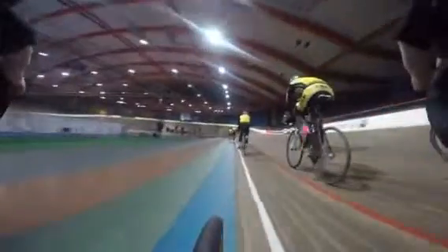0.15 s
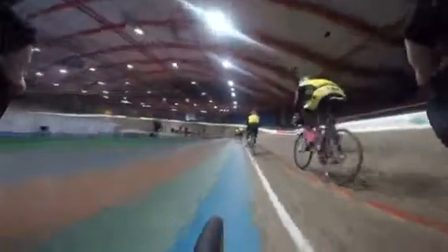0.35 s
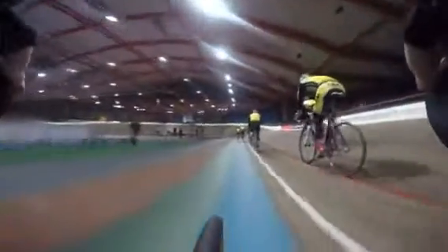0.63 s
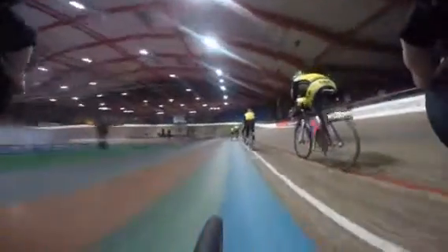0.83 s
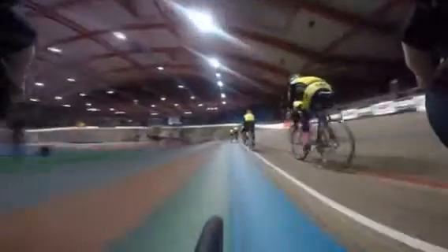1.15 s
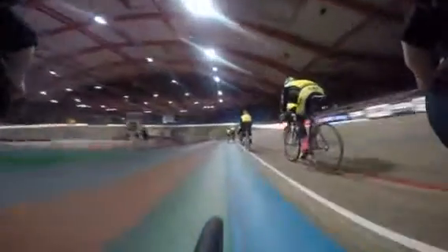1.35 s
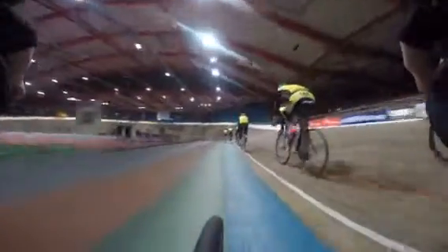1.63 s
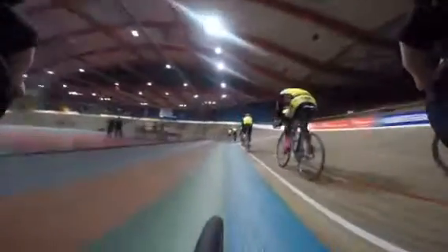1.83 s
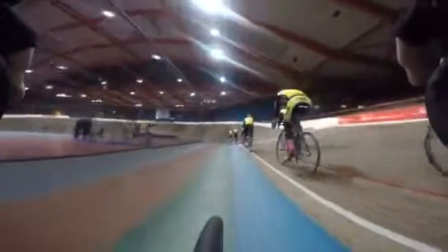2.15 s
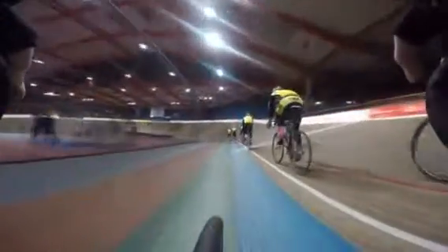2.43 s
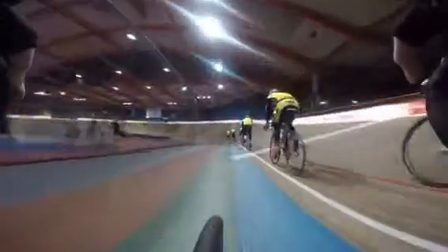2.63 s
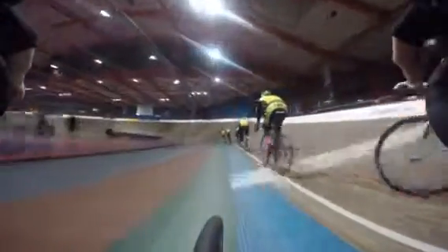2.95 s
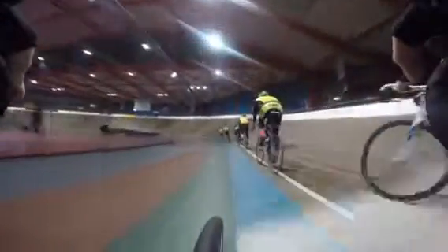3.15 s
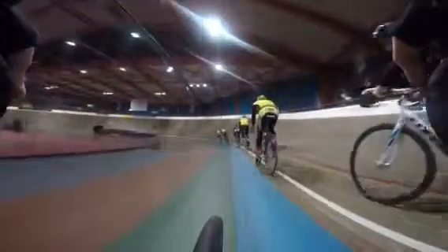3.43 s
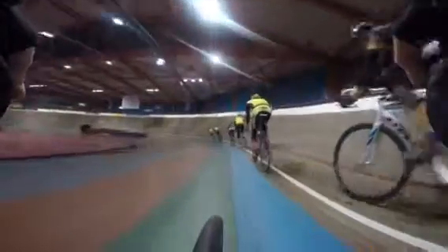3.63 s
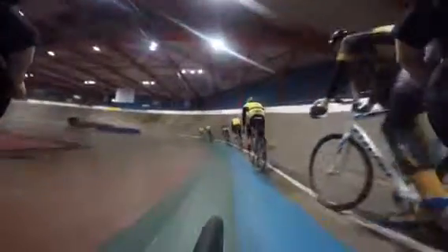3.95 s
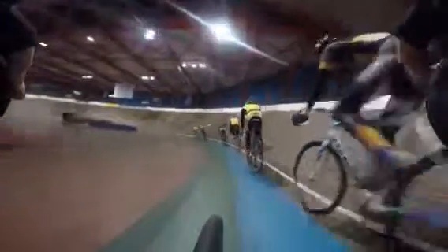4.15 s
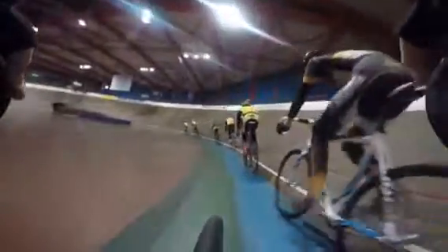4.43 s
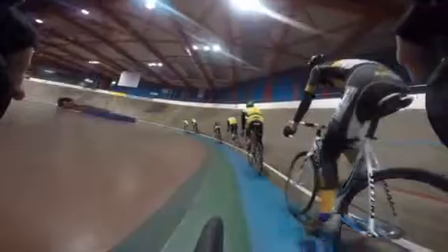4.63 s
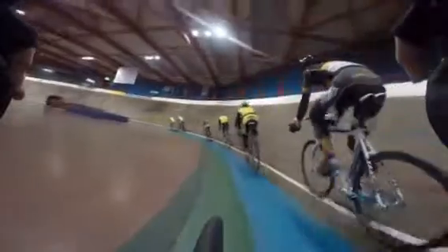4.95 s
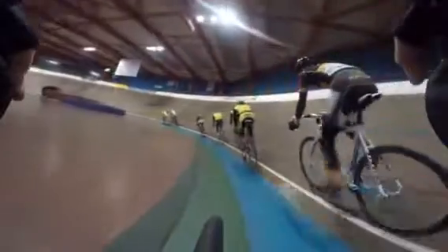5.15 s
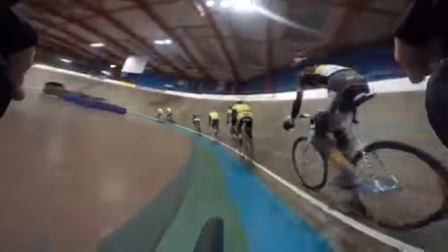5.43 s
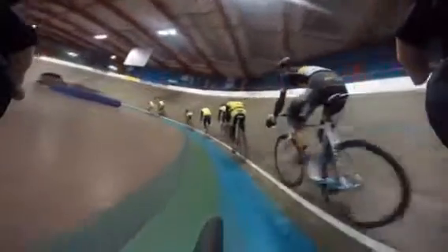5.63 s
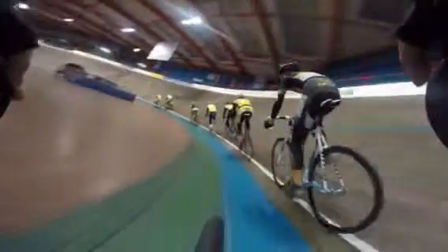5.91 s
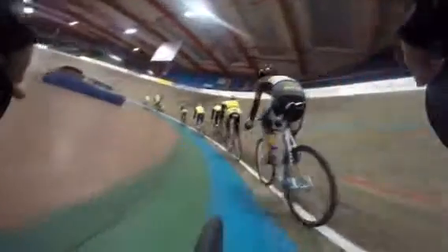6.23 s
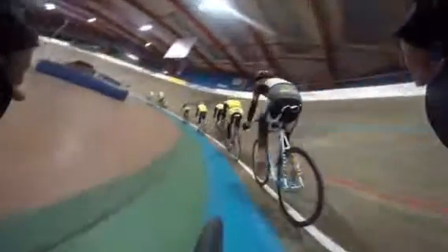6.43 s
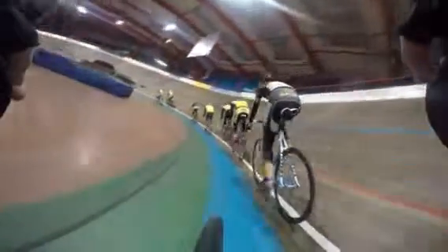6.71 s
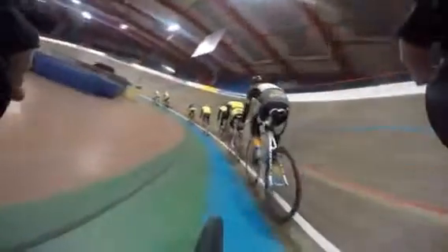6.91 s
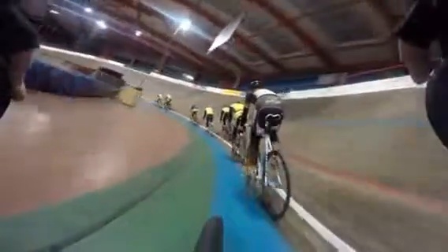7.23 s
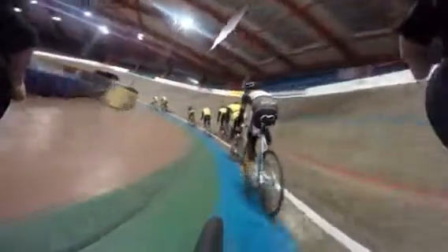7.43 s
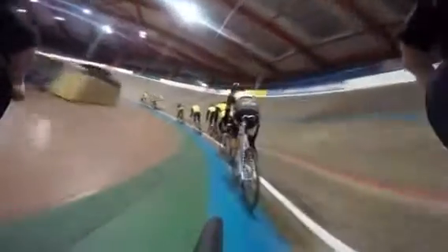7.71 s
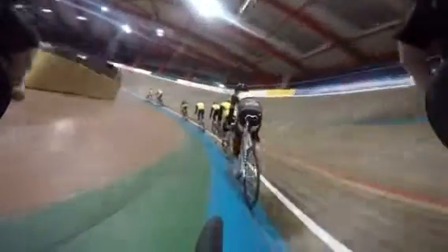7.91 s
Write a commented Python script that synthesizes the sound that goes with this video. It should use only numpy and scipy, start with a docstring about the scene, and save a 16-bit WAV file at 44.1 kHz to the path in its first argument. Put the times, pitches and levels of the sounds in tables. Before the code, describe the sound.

A track bicycle rolls around an indoor wooden track, heard from a microphone fixed under the handlebar. Low wind buffeting runs throughout, over a hollow tyre drone and irregular knocks from the boards. The chain chatters in pulses with the pedalling, throwing off sharp metallic clacks. The handlebar briefly shudders a few times and faint chirps come and go. Near the end the chain softens and the clacks thin out.

```python
"""A track bicycle laps an indoor wooden velodrome, heard from a camera bolted under its handlebar.
From the start wind buffets the case, tyres drone and knock on the boards through the ringing mount,
and the chain chatters and clacks through the frame, harder with each pedal stroke. The bar shudders
at 0.7 and 1.8 s; brief hollow chirps come and go. Around 4.3 s the hall's wash swells slightly as a
rider overtakes. From about 6 s the strokes soften and the bar shudders three more times."""
import sys
import numpy as np
from scipy import signal
from scipy.fft import rfft, irfft
from scipy.io import wavfile
from scipy.ndimage import uniform_filter1d

SR = 44100
rng = np.random.default_rng(int(sys.argv[2]) if len(sys.argv) > 2 else 0)


def persist_wave(psi):
    """Save psi, clipped to +-1, as 16-bit WAV."""
    counts = np.round(np.clip(psi, -1, 1) * 32767).astype(np.int16)
    wavfile.write(sys.argv[1], SR, np.atleast_2d(counts).T)


N = 355887
T = np.arange(N) / SR
TAPS = 8192
HZ = np.fft.rfftfreq(TAPS, 1 / SR)

# links meeting the sprocket: (time [s], rate [1/s])
LINK_RATE = [(0, 72.4), (1.2, 65.3), (2.2, 58.7), (3.3, 68.4), (4.9, 64.2), (6.3, 69.4), (8.07, 64.6)]
# links snapping hard onto a tooth: (time [s], level [dB], relative sparkle [dB], ping share [dB])
HARD_CLACKS = [(0.507, -11, -30, -2), (0.6068, -3, -30, -1), (1.2216, -13.5, -39, -3),
               (1.291, -15.5, -41, -5), (1.3374, -12, -29, -7), (1.646, -12, -41.5, -7),
               (1.8471, -6.5, -31, 0.5), (1.9653, -2, -43, -1), (2.6294, -11.5, -43, -7),
               (2.6904, -7.5, -42, -2.5), (2.896, -12, -29, -5.5), (3.1329, -11, -37, -2.5),
               (3.2502, -11.5, -24, -8.5), (3.3407, -8, -24, -5), (3.3717, -8.5, -32, -13),
               (3.7432, -11, -37, -8), (3.7909, -12, -23, -9), (4.0014, -1, -32.5, -0.5),
               (4.0631, -14, -40, -7), (4.125, -9, -26, -6), (4.1865, -9, -40, -4), (4.489, -10, -30, -9),
               (4.5519, -10.5, -26, 2), (4.8004, -11, -14, -4), (4.8328, -3, -37, -3),
               (5.0631, -13, -33.5, -9), (5.157, -14, -17, -2), (5.203, -6.5, -31.5, -3.5),
               (5.5808, -9, -37, -2), (5.6132, -5.5, -30, -6.5), (5.6726, -16, -37, -8),
               (6.3018, -11.5, -38, -4.5), (6.9204, -18, -21, -12)]


def wind(level_db=1.8, flutter_db=-0.5, gust_db=1.5):
    """Eddies shed by the case press on the microphone: big slow lumps and a finer flutter."""
    # big eddies: (time [s], level [dB])
    lump_levels = [(0.0, -18), (0.4, -15), (0.81, -20.5), (1.01, -18), (3.43, -17), (3.63, -20),
                   (4.24, -16), (4.44, -19.5), (4.64, -15.5), (4.84, -17), (5.25, -15.5), (5.45, -17),
                   (5.65, -14), (5.85, -19), (7.06, -17.5), (7.46, -20), (7.67, -15.5), (8.07, -18.5)]
    # their spectrum: (frequency [Hz], gain [dB])
    lump_spectrum = [(10, -7.5), (18, -7.5), (35, 2), (60, -1), (85, -6), (110, -14.5), (160, -29.5),
                     (400, -70)]
    # fine eddies: (time [s], level [dB])
    flutter_levels = [(0.0, -26.5), (1.82, -26), (3.43, -23.5), (3.63, -29.0), (5.04, -23), (6.05, -28),
                      (6.25, -24.5), (6.66, -27.5), (6.86, -25.5), (7.46, -27.5), (7.87, -27), (8.07, -34)]
    # their spectrum: (frequency [Hz], gain [dB])
    flutter_spectrum = [(50, -22), (90, -4), (120, -1.5), (160, -3), (230, -8), (320, -12.5), (600, -18.5),
                        (1500, -53.5)]
    lumps = steadied(through(rng.standard_normal(N), slope(lump_spectrum)), 0.119)
    flutter = steadied(through(rng.standard_normal(N), slope(flutter_spectrum)), 0.14)
    lumps *= gain_of(curve(lump_levels) + level_db)
    flutter *= gain_of(curve(flutter_levels) + flutter_db + gust_db * drift(6.6))
    return lumps + flutter


def tyres(level_db=-0.36, grain_db=2):
    """The grain of the boards shakes the wheels; the mount turns it into a hollow drone."""
    # rolling: (time [s], level [dB])
    roll_levels = [(0.0, -17.5), (2.02, -20), (2.22, -23.5), (2.62, -20.5), (3.03, -20.5), (3.43, -18.5),
                   (3.63, -23.5), (3.83, -20.5), (5.65, -20), (5.85, -18), (6.25, -17.0), (6.46, -20.0),
                   (7.67, -19), (8.07, -16)]
    force = rng.standard_normal(N) * gain_of(grain_db * drift(79))
    return steadied(through(force, mount_gain()), 0.112) * gain_of(curve(roll_levels) + level_db)


def knocks(level_db=-0.5, width_oct=0.58, hollow=0.8, rebound_s=0.00946, rebound_db=-8):
    """A bump jolts the mount, which rebounds once; harder bumps reach its upper resonances."""
    # joints and bumps in the boards: (time [s], level [dB], spectral centre [Hz])
    bumps = [(0.174, -10.5, 465), (.277, -13, 711), (.437, -11.5, 430), (1.431, -9, 640), (1.704, -9, 470),
             (1.85, -10.5, 485), (1.970, -7.5, 530), (2.052, -12, 700), (2.121, -10.5, 432),
             (2.481, -10.5, 440), (2.735, -6.5, 410), (3.005, -12, 480), (3.072, -15, 680),
             (3.288, -11.5, 459), (3.374, -13.5, 596), (3.487, -9.5, 635), (3.828, -9, 600),
             (4.067, -12, 460), (4.219, -11.5, 439), (4.598, -11.5, 472), (4.612, -9.5, 700),
             (5.307, -11, 562), (5.584, -11.5, 502), (6.124, -12, 463), (6.361, -13.5, 589),
             (6.7, -11.5, 440), (7.363, -9.5, 444), (7.452, -9.5, 430), (7.999, -10, 415)]
    out = np.zeros(N)
    mount = mount_gain() ** hollow
    for time_s, db, centre_hz in bumps + light_knocks():
        blow = np.exp(-(np.log2(HZ / centre_hz + .001) / width_oct) ** 2) + .002
        jolt = gain_of(db + level_db) * unit_peak(ring(mount * blow), .007)
        add(out, time_s - .002, jolt)
        add(out, time_s - .002 + rebound_s, gain_of(rebound_db) * jolt)
    return out


def light_knocks(count=20, level_db=-16, spread_db=2, centre_hz=470, spread_oct=0.22):
    """One small bump in each stretch of track: (time [s], level [dB], spectral centre [Hz])."""
    place, size, hardness = rng.uniform(-1, 1, (count, 3)).T
    times_s = (np.arange(count) + .5 + place / 2) * T[-1] / count
    return list(zip(times_s, level_db + spread_db * size, centre_hz * 2 ** (spread_oct * hardness)))


def mount_gain():
    """Path from wheels to microphone: the camera mount's resonances."""
    # mount modes: (frequency [Hz], width [Hz], gain [dB])
    modes = [(366, 21, -3), (421, 56.5, 3.5), (461, 46, 1.5), (536.3, 81, -3.5), (624, 37, -18),
             (641, 50, -10), (749, 56, -17.5), (768, 16, -26), (911, 21, -15.5), (1095, 58, -18),
             (1272, 128, -15.5)]
    return peaks(modes)


def handlebar(mode_hz=77.3, wander_hz=3.55, waver_db=2.7, level_db=-3.0):
    """Track and wind shake the bar, which hums on one narrow mode."""
    # hard shaking: (start [s], length [s], level [dB])
    shudders = [(.68, 0.23, -11.5), (1.8, 0.14, -12), (5.85, 0.3, -13), (6.27, 0.2, -9), (7.31, 0.11, -9)]
    phase = 2 * np.pi * np.cumsum(mode_hz + wander_hz * drift(9.1)) / SR
    hum = unit_rms(np.sin(phase) * gain_of(waver_db * drift(11)))
    return hum * swells(shudders, idle_db=-22.5, edge_s=0.11) * gain_of(level_db)


def chain(level_db=-2, seat_s=0.0049, alternate_db=1.5, uneven_db=2.86, colour_db=3,
          rub=0.75, rub_db_per_band=-4, grit_db=4.5, dulling=0.11):
    """Each roller rattles onto its tooth; inner and outer links alternate strong and weak."""
    links, pull = link_count() + 2, tension()
    link, age_s = links.astype(int), (links % 1) / curve(LINK_RATE)
    link_db = alternate_db * (-1.) ** link + uneven_db * rng.standard_normal(N)[link]
    seating = np.exp(-age_s / seat_s) * gain_of(link_db)
    lowpasses = [1 / (1 + (HZ / edge_hz) ** 12) for edge_hz in (2850, 3750, 6500)]
    band_shares = np.diff(lowpasses, axis=0, prepend=0, append=1)
    out = np.zeros(N)
    for band, share in enumerate(band_shares):
        # no two links excite the frame alike
        blows = unit_rms(seating * gain_of(colour_db * np.clip(rng.standard_normal(N), -2, 2)[link]))
        rubbing = rub * gain_of(rub_db_per_band * band)  # dull, so ticks are clearest in the treble
        force = (blows + rubbing) * rng.standard_normal(N) * gain_of(grit_db * drift(690))
        gain = frame_gain() * np.sqrt(abs(share))
        # a taut chain adds more body than treble
        out += np.linalg.norm(gain) * through(force, gain) / unit_rms(pull) ** (dulling * band)
    return steadied(out, 0.124) * pull * gain_of(level_db)


def clacks(level_db=-5, snap_s=0.002, tilt_db_per_oct=-1.0, sparkle_db=2,
           judder_db=-5, judder_s=0.0062, judder_hz=2600, ping_hz=3280, ping_width_hz=280):
    """A taut link snaps home and rings the frame; steel sparkles, slower bending waves judder after."""
    out, t = np.zeros(N), T[:TAPS // 2]
    lowpass = 1 / (1 + (HZ / 6500) ** 8)
    body = ring(frame_gain() * lowpass * gain_of(tilt_db_per_oct * np.log2(HZ / 3000 + 0.0092)))
    steel = ring(frame_gain() * (1 - lowpass) * (HZ / SR) ** 2)
    tubes = ring(frame_gain() / (1 + (HZ / judder_hz) ** 3))
    main_mode = ring(peaks([(ping_hz, ping_width_hz, 0)]))
    for time_s, db, steel_db, ping_db in HARD_CLACKS + light_clacks():
        contacts = rng.choice([-1., 1.], len(t))  # burst of tiny metal contacts
        snap = contacts * np.exp(-t / snap_s)
        judder = contacts * t * np.exp(-t / judder_s)
        ping_share = min(gain_of(ping_db) ** 2, .9)
        clack = ping_share * struck(snap, main_mode) + (1 - ping_share) * struck(snap, body)
        clack += gain_of(steel_db + sparkle_db) * struck(snap, steel)
        clack += gain_of(judder_db) * np.sqrt(1 - ping_share) * struck(judder, tubes)
        add(out, time_s, gain_of(db + level_db) * clack)
    return out


def light_clacks(chance=.45, taut_db=-24, over_db=6.5, spread_db=1.5,
                 steel_db=-31, steel_spread_db=6, ping_db=-7):
    """Outer links may snap home on a taut chain, as hard as it is pulled; rows like HARD_CLACKS."""
    at = np.flatnonzero(np.diff(link_count() // 2) > 0)
    luck, size, shine = rng.random((len(at), 3)).T
    pull_db = 20 * np.log10(tension()[at])
    levels_db = pull_db + over_db + spread_db * (2 * size - 1)
    sparkles_db = steel_db + steel_spread_db * (2 * shine - 1)
    rows = np.c_[T[at], levels_db, sparkles_db, np.full(len(at), ping_db)]
    return list(rows[luck < chance * np.clip(pull_db - taut_db, 0, 1)])


def tension():
    """Pedal strokes pull the chain taut; returns the gain of its chatter."""
    # pedal strokes, nearly three a second: (start [s], length [s], level [dB])
    strokes = [(.135, 0.14, -25.5), (.5, 0.15, -25), (.81, 0.24, -27), (1.2, .23, -22), (1.5, 0.16, -23.5),
               (1.81, 0.21, -25.5), (2.19, .22, -27), (2.54, .21, -24), (2.89, 0.18, -22.5),
               (3.16, 0.31, -31), (3.61, 0.26, -24.5), (3.99, 0.29, -23.5), (4.32, 0.29, -22.5),
               (4.7, 0.25, -27), (5.05, 0.24, -23), (5.4, 0.32, -24), (5.8, 0.2, -22.5), (6.08, 0.16, -28),
               (6.3, 0.11, -29.5), (6.73, 0.35, -29.5), (7.2, 0.29, -30.5), (7.54, .37, -31)]
    return swells(strokes, idle_db=-31, edge_s=.06)


def link_count():
    """Links that have met the sprocket so far, eased so that each hard clack falls on a link."""
    links = np.cumsum(curve(LINK_RATE)) / SR
    clacks_s = np.sort(np.transpose(HARD_CLACKS)[0])
    slip = np.unwrap(np.interp(clacks_s, T, links), period=1)
    return links - np.interp(T, clacks_s, slip)


def frame_gain():
    """Path from chain to microphone: sharp resonances on a falling bed."""
    # frame and case modes: (frequency [Hz], width [Hz], gain [dB])
    modes = [(1045, 45, -7.5), (1229, 25, -4.5), (1317, 97, -1.5), (1436, 9.4, -1.5), (1703, 49, -7),
             (1910, 57, -12), (2020, 120, -12), (2220, 110, -14.5), (2416, 107, -1), (2580, 100, -45),
             (2745, 40, -4), (3181, 184, 3), (3317, 81, 5), (3530, 76, -11), (3600, 25, -18),
             (4020, 163, -5), (4400, 68, -3.5), (4590, 190, -4), (4840, 130, -12), (5090, 100, -5),
             (5400, 760, -24), (6080, 200, -15), (6850, 60, -20.5), (7630, 190, -18), (8125, 170, -16.5),
             (8660, 130, -24.5), (9130, 130, -26.5), (9640, 190, -29.5), (10100, 110, -27.5)]
    # response between the modes: (frequency [Hz], gain [dB])
    bed = [(200, -50), (500, -4.5), (850, -16.5), (1550, -44), (2900, -24), (3800, -42), (5300, -47),
           (7000, -29), (9000, -53), (11000, -40), (13000, -43), (16000, -61)]
    return np.hypot(peaks(modes), slope(bed))


def chirps(level_db=-1.0, half_s=0.018, rise=0.052, waver=0.134, rough=0.44):
    """A few dozen cycles of a slightly rising, rough tone."""
    # hollow chirps among the knocks: (time [s], level [dB], pitch [Hz])
    events = [(.754, -25, 840), (2.729, -28, 953), (2.789, -25, 1030), (2.948, -25.5, 1026),
              (3.606, -27, 1020), (4.979, -20, 813), (5.431, -29, 1086), (5.851, -25.5, 1040)]
    out, t = np.zeros(N), T[:TAPS // 2] - T[TAPS // 4]
    wavering, flutter = drift(300), drift(150)
    for time_s, db, hz in events:
        pitch_hz = hz * (1 + rise * np.tanh(t / half_s / 2) + waver * np.interp(time_s + t, T, wavering))
        tone = np.sin(2 * np.pi * np.cumsum(pitch_hz) / SR)
        envelope = (1 + rough * np.interp(time_s + t, T, flutter)) * np.exp(-(t / half_s) ** 2)
        add(out, time_s + t[0], gain_of(db + level_db) * unit_peak(tone * envelope, 0.02))
    return out


def hall(level_db=-34.5, pull_db_per_decade=3, overtake_db=2, overtake_s=4.3, overtake_width_s=1.1):
    """Other riders, rushing air and the chain's echo blur to a wash that swells as a rider overtakes."""
    # wash under the roof: (frequency [Hz], gain [dB])
    spectrum = [(100, 13), (400, 1), (900, 9.5), (1600, 4), (3000, 6), (5500, -5.5), (8000, -19),
                (11000, -63), (13000, -52), (16000, -67)]
    nearness = 1 / (1 + ((T - overtake_s) / overtake_width_s) ** 2)
    db = level_db + pull_db_per_decade * np.log10(unit_rms(tension())) + overtake_db * nearness
    return unit_rms(through(rng.standard_normal(N), slope(spectrum))) * gain_of(db)


def gain_of(db):
    """Decibels to an amplitude factor."""
    return 10 ** (np.asarray(db) / 20)


def unit_rms(x):
    """Scales to rms 1."""
    return x / np.sqrt(np.mean(x ** 2) + 1e-20)


def unit_peak(x, span_s):
    """Scales a blow so that its loudest span has rms 1."""
    return x / np.sqrt(uniform_filter1d(x ** 2, int(span_s * SR), mode="constant").max())


def steadied(x, span_s):
    """Divides out swells slower than the span, leaving rms 1."""
    return x / np.sqrt(abs(uniform_filter1d(x ** 2, int(span_s * SR))) + 1e-12)


def curve(rows):
    """Per-sample control curve from (time [s], value) rows."""
    return np.interp(T, *np.transpose(rows))


def drift(rate_hz):
    """Random wander of rms 1, with changes up to this rate."""
    hz = np.fft.rfftfreq(N, 1 / SR)
    return unit_rms(irfft(rfft(rng.standard_normal(N)) / (1 + (hz / rate_hz) ** 4), N))


def swells(rows, idle_db, edge_s):
    """A steady gain plus swells that rise, hold and fall."""
    power = np.full(N, gain_of(idle_db) ** 2)
    for start_s, length_s, db in rows:
        inside_s = np.minimum(T - start_s, start_s + length_s - T)
        power += (gain_of(db) * np.clip(.5 + inside_s / edge_s, 0, 1)) ** 2
    return np.sqrt(power)


def slope(points):
    """Gain curve through (frequency [Hz], gain [dB]) points."""
    hz, db = np.transpose(points)
    return gain_of(np.interp(np.log(HZ + 1), np.log(hz), db))


def peaks(modes):
    """Gain curve of steep-sided resonances, summed in power."""
    return np.sqrt(sum(gain_of(db) ** 2 / (1 + ((HZ - hz) / (0.63 * width_hz)) ** 2) ** 2
                       for hz, width_hz, db in modes))


def ring(gain):
    """Minimum-phase impulse response of a gain curve, with energy 1."""
    log_gain = np.log(np.maximum(np.r_[gain, gain[-2:0:-1]], 1e-5))
    response = np.fft.ifft(np.exp(np.conj(signal.hilbert(log_gain)))).real[:TAPS // 2]
    return response / np.linalg.norm(response)


def through(force, gain):
    """Passes a force through a body with this gain curve."""
    return signal.oaconvolve(force, ring(gain))[:len(force)]


def struck(force, response):
    """A short force rings a body; the loudest 3 ms have rms 1."""
    return unit_peak(signal.fftconvolve(force, response), .003)


def add(mix, start_s, sound):
    """Lays a sound into the mix."""
    part = mix[max(round(start_s * SR), 0):][:len(sound)]
    part += sound[:len(part)]


def scene():
    """All sources meet at one microphone."""
    return (wind() + handlebar() + tyres() + knocks() + chirps() + chain() + clacks() + hall())[None]


def record(dry, ceiling=.97, cutoff_hz=15400):
    """Soft clip, then low-pass."""
    rounded = dry / (1 + (dry / ceiling) ** 8) ** (1 / 8)
    lowpass = signal.firwin(511, cutoff_hz, window=("kaiser", 9), fs=SR)
    return signal.oaconvolve(rounded, lowpass[None], "same")


dry = scene()
out = record(dry)
persist_wave(out)
```